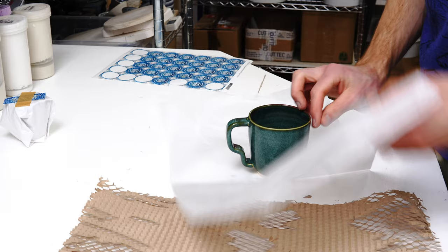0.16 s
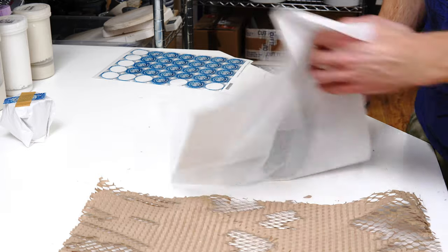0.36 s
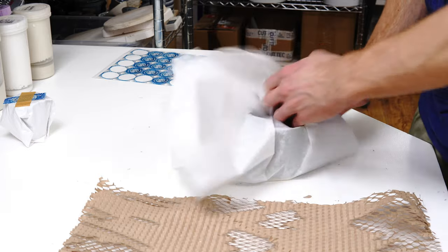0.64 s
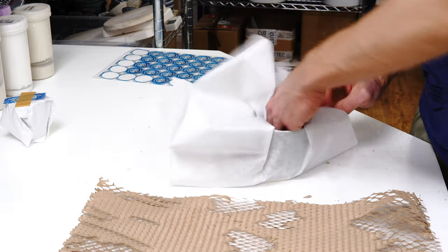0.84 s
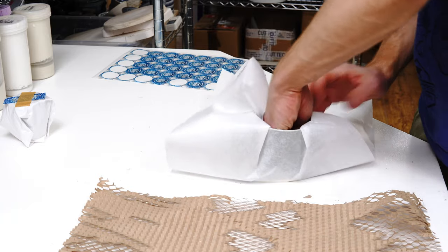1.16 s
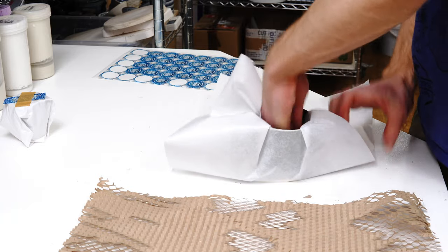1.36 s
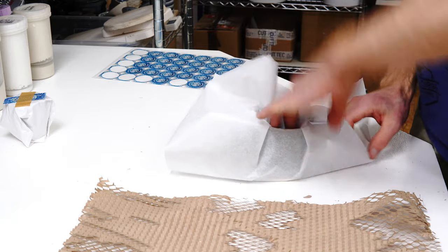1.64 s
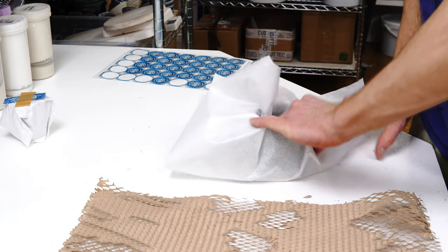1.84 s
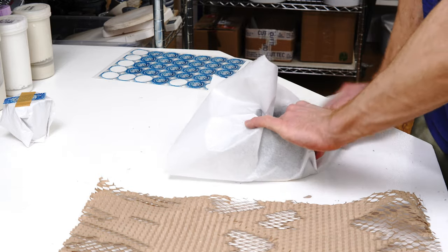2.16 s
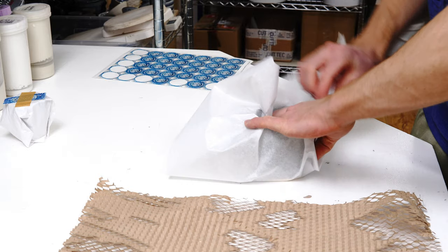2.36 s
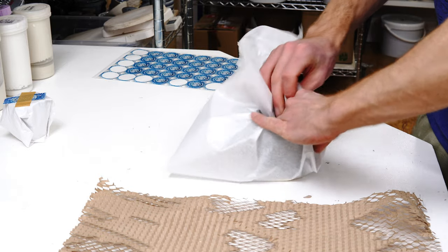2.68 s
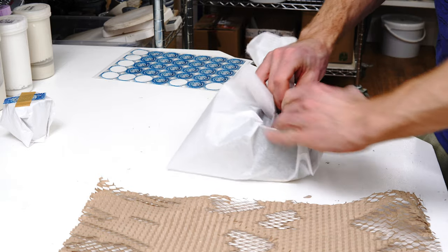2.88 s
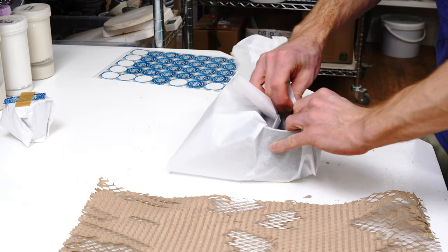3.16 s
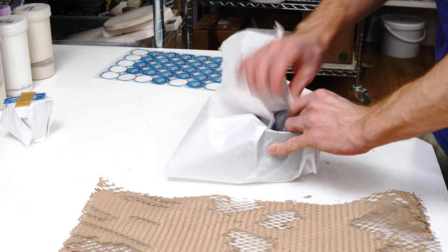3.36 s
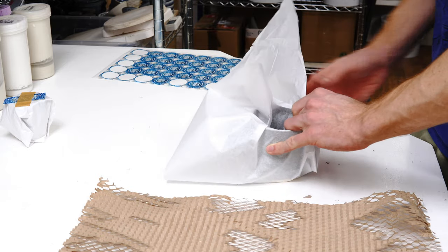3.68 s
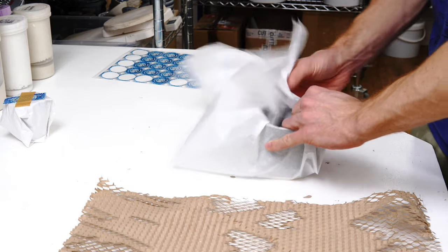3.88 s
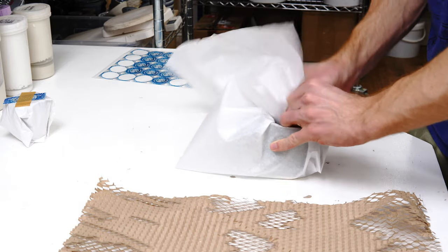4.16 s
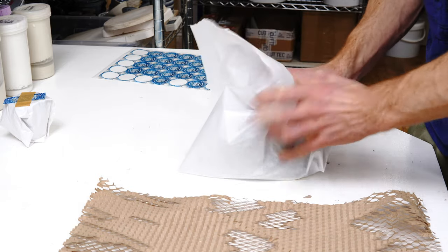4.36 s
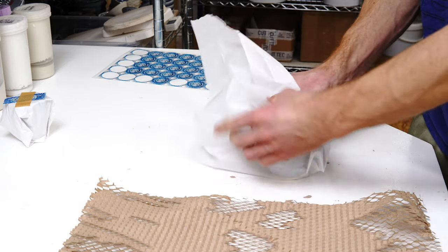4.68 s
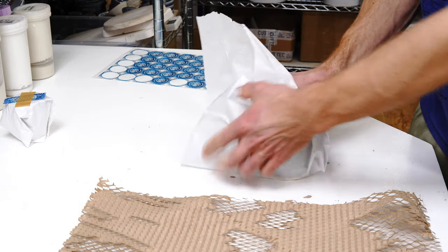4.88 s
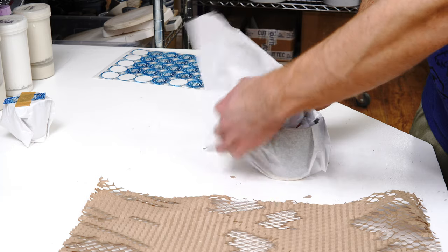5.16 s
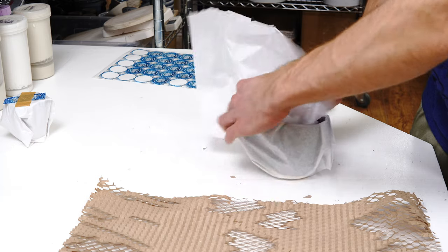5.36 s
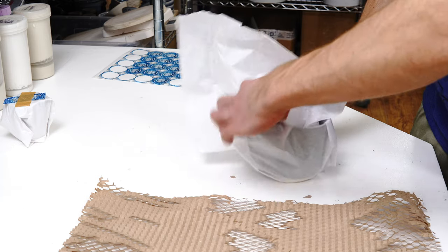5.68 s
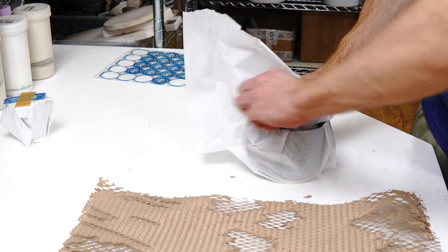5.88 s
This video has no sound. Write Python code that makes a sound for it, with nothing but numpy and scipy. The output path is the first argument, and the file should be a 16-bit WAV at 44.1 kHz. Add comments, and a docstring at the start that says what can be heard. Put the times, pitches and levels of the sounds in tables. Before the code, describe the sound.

Crisp, bright paper crinkling in quick uneven bursts, stuffed into a mug, while the wrapped ceramic clunks softly on a workbench in a small room.

```python
"""Tissue paper is folded over a ceramic mug on a workbench and tucked into its opening.
The sheet hisses as it slides, shaped noise; its creases buckle in clumps of filtered impulses.
Single folds snap with a sharp resonant click; the wrapped mug knocks on the bench as decaying modes.
Noise through resonances sounds the hollow of the mug, dull noise the hands on the bench.
A small workshop answers with decaying noise and adds mains hum and still air."""
import sys
import numpy as np
from scipy import signal
from scipy.fft import rfft, irfft, next_fast_len
from scipy.io import wavfile
from scipy.ndimage import uniform_filter1d, map_coordinates

SR = 44100
rng = np.random.default_rng(int(sys.argv[2]) if len(sys.argv) > 2 else 0)


def file_out(sig):
    """Save sig as 16-bit WAV at sys.argv[1]."""
    # one column per channel
    cols = np.atleast_2d(sig).T
    # limit, then scale
    lim = np.clip(cols, -1, 1)
    pcm = np.round(lim * 32767).astype(np.int16)
    wavfile.write(sys.argv[1], SR, pcm)


N = 265923

# colour of the sliding and buckling sheet: [f/Hz, relative level/dB]
PAPER_COLOUR = [(150, -29), (500, -14.5), (1000, -8), (1500, -10), (2000, -7.5), (2600, -4.5), (3400, -0.5),
                (4000, -4.5), (5000, -3.5), (6000, -6), (7300, -10.5), (10000, -11.5), (13000, -13),
                (16000, -21)]


def facet(pitch_hz, lift_db, octaves):
    """Plate resonance: one facet raises a broad band of the paper's colour around its pitch."""
    def shape_db(hz):
        distance = np.log2((hz + 1) / pitch_hz) / octaves
        return along(PAPER_COLOUR, hz) + lift_db * np.exp(-distance ** 2)
    return shape_db


def crinkle(level_db, crisp_db):
    """Buckling instability: facets of many sizes click in clumps over the hiss of sliding friction."""
    pace = amp(0.9 * (level_db - level_db.mean()))  # faster handling buckles more facets
    clicks = np.zeros(N)
    for pitch_hz in np.geomspace(1500, 14000, 10):
        share = amp(1.45 * wobble(11))  # the sheet keeps changing shape, so facet sizes come and go
        impulses = buckles(250 * pace, spread_db=4.5)
        clicks += share * coloured(impulses, facet(pitch_hz, lift_db=11, octaves=0.46))
    hiss = amp(-3.5) * noise(PAPER_COLOUR)
    sheet = unit(clicks / np.sqrt(pace)) + hiss
    clumps = slips(260 * pace ** 0.7, t60=0.022, spread_db=4.5)
    sheet = unit(sheet * clumps) * amp(level_db - 0.27)
    # a taut sheet and the heart of each clump sound brighter
    treble = filtered(sheet, lambda hz: hz ** 4 / (hz ** 4 + 6000 ** 4))
    treble_gain = amp(crisp_db - 1.86) * clumps ** 0.37
    return sheet + (treble_gain - 1) * treble


def buckles(rate, spread_db):
    """Shot noise: random impulses, rate a second, many small ones and a few large."""
    sizes = amp(spread_db * np.minimum(rng.standard_normal(N), 1.5))
    happens = rng.random(N) < rate / SR
    return happens * sizes * rng.choice([-1, 1], N)


def slips(rate, t60, spread_db):
    """Stick-slip: the sheet gives way in quick jerks that flare and die; a levelled envelope near rms 1."""
    t = np.arange(SR // 8) / SR
    flare = (1 - np.exp(-t / 0.0025)) * amp(-120 * t / t60)  # a power, so 60 dB down after t60
    power = np.abs(signal.fftconvolve(buckles(rate, spread_db) ** 2, flare)[:N])
    power = power / power.mean() + 0.73
    return np.sqrt(power / uniform_filter1d(power, SR // 20))


# pushes and pulls on the sheet: drawn over the mug and stuffed in, the side gathered, a corner tucked in,
# the last flap pressed down, the bundle twisted shut
# [t/s, rise t/s, length t/s, crinkle level/dB, treble lift level/dB, rubbing level/dB, brushing level/dB]
# the last three columns are relative to the crinkle
HAND_STROKES = [ (0.0, .09, .17, -23, 1.5, -30, -32), (0.222, 0.054, .16, -24.5, 2.5, -11, -19.5),
                (0.383, .045, 0.071, -17, 1, -9, -20), (0.476, .02, .09, -28.5, -5, 1, -11),
                (0.557, 0.064, .42, -16.5, 0, -7.5, -24.5), (0.984, .03, .17, -19, -4, -8.5, -18.5),
                (1.316, .008, .08, -29.5, -11, -22, -27), (1.38, 0.066, .13, -24.5, -2, -10.5, -22),
                (1.555, 0.024, .11, -31, -5, -8, -20), (1.709, 0.085, 0.17, -23, 1.5, -5.5, -16.5),
                (1.877, 0.042, .12, -23, 0, -4, -15.5), (2.022, .02, 0.084, -29.5, -2.5, -4.5, -16),
                (2.165, .03, 0.1, -31.5, -1, -6, -21), (2.246, 0.09, 0.11, -21, -0.5, -8.5, -18),
                (2.356, .05, 0.079, -19, 2, -8, -18.5), (2.487, 0.026, 0.36, -26, -2.5, -7.5, -20),
                (2.86, 0.026, 0.091, -28, -2, -6.5, -23), (2.955, .04, 0.077, -22, -5, -9.5, -19),
                (3.098, .04, 0.17, -24.5, 0, -7, -22.5), (3.28, .02, .07, -33, -2, -10, -19),
                (3.34, .07, .15, -26.5, -2, -8.5, -19.5), (3.517, .03, 0.14, -31, -4, -6.5, -14.5),
                (3.839, 0.013, .07, -20.5, 0.5, -8, -17), (3.881, .05, 0.075, -16.5, 0, -5.5, -19.5),
                (3.975, .02, .14, -23.5, -4.5, -5.5, -20), (4.13, 0.055, 0.24, -22.5, -2.5, -6, -20.5),
                (4.379, 0.021, .12, -26, -1, -5.5, -16), (4.579, 0.094, 0.13, -16, -3.5, -6.5, -22),
                (4.718, 0.035, 0.07, -19, 3, -4, -16), (4.816, 0.022, 0.15, -26, 1.5, -5, -16.5),
                (5.001, .04, 0.4, -20.5, -1.5, -5, -21), (5.422, 0.057, 0.083, -23, 2, -6, -21),
                (5.555, .035, 0.071, -24.5, -1.5, -9.5, -28), (5.648, 0.018, .08, -33.5, -1, -7, -18),
                (5.723, 0.035, 0.095, -27, 1, -6.5, -26.5), (5.857, .05, 0.14, -22.5, -2, -6.5, -24)]
RISE_DB, SAG_DB_PER_S, RELEASE_DB_PER_S = 11.5, 7, 211.5  # a stroke swells, tires, and the sheet settles
HELD_DB, HELD_TREBLE_DB, HELD_RUB_DB, HELD_BRUSH_DB = -45, 1, -43, -58.5  # the sheet merely held


def handling():
    """Incoherent addition: the powers of all strokes sum to crinkle, treble, rub and brush levels in dB."""
    held = amp([HELD_DB, HELD_DB + HELD_TREBLE_DB, HELD_RUB_DB, HELD_BRUSH_DB]) ** 2
    paper, treble, rubbing, brushing = np.outer(held, np.ones(N))
    t = np.arange(SR) / SR
    for s, rise, length, db, lift_db, rub_db, brush_db in HAND_STROKES:
        swell_db = RISE_DB * np.minimum(t / rise - 1, 0)
        sag_db = SAG_DB_PER_S * np.maximum(t - rise, 0)
        release_db = RELEASE_DB_PER_S * np.maximum(t - length, 0)
        power = amp(db + swell_db - sag_db - release_db) ** 2
        add(paper, s, power)
        add(treble, s, power * amp(lift_db) ** 2)
        add(rubbing, s, power * amp(rub_db) ** 2)
        add(brushing, s, power * amp(brush_db) ** 2)
    return 10 * np.log10([paper, treble / paper, rubbing, brushing])


# single folds that snap through, loud and faint:
# [t/s, relative level/dB, pitch f/Hz, relative level of the small clicks around the snap/dB]
FOLD_SNAPS = [(0.2888, -1.5, 5000, 4), (0.3338, 0, 5530, 7.5), (0.4359, 0, 4800, 7), (.516, -5, 4200, 2),
              (0.6664, -1, 5300, 7), (0.7226, 0, 4200, -9), (.8674, -5, 4500, 3), (0.916, 2, 3600, -4),
              (1.0291, 1.5, 4100, 2.5), (1.082, 0, 3680, 1), (1.125, 3.5, 4500, -1), (1.1663, 0, 3600, -12),
              (1.2405, -13, 3700, -5), (1.2966, -19.5, 3300, 3), (1.5752, -1.5, 4100, -5),
              (1.593, -8, 4000, 2.5), (1.665, -10, 3900, -2), (1.713, -15, 4700, 7),
              (1.8065, -1, 5100, 4.5), (1.861, -2, 4700, 0.5), (1.958, -3, 4600, 4),
              (1.9865, -2, 4200, 2.5), (2.164, -6.5, 3580, -3), (2.184, -11.5, 4100, 3),
              (2.478, -4, 4600, 4), (2.5236, 0, 4200, -5), (2.664, -9.5, 5100, 6), (2.7005, -5.5, 3480, 3),
              (2.811, -3.5, 4240, -6), (2.9154, -5, 6000, 4), (3.0609, -8.5, 3200, 6),
              (3.278, -9.5, 7200, 1), (3.3702, -3.5, 5000, -6), (3.451, -6.5, 4600, 6.5),
              (3.6306, -7, 4700, 7.5), (3.7067, -12, 5100, 1), (3.7305, -19, 4200, 4.5),
              (3.804, -16, 3190, 1), (3.8349, -6.5, 5100, -2), (4.1582, 0, 3240, 3),
              (4.6554, -3.5, 4000, 1), (4.8706, -3, 4600, 0), (4.9577, -10, 5300, 4), (5.0451, 3, 5000, -4),
              (5.0642, -4, 4370, 7.5), (5.139, -1.5, 4420, 1.5), (5.499, -8, 3800, 7.5),
              (5.5075, -3.5, 5000, 3)]


def snaps():
    """Snap-through: small clicks build up, the fold flips with a sharp one and sets off a short run."""
    lead_s = 0.008
    out = np.zeros(N)
    t = np.arange(-round(lead_s * SR), SR // 12) / SR
    for s, db, pitch_hz, trail_db in FOLD_SNAPS:
        click = coloured(signal.unit_impulse(256), facet(pitch_hz, lift_db=5, octaves=0.5))
        click = click / np.abs(click).max()
        swell_db = np.minimum(60 * t / 0.0092, -60 * t / 0.036)  # fast growth, slower decay
        run = rng.standard_normal(len(t)) * amp(3.3 * rng.standard_normal(len(t)) + swell_db)
        push = amp(trail_db + 3.0) * run / np.linalg.norm(run)
        push[t == 0] = 1  # the snap itself
        add(out, s + t[0], amp(db - 3.5) * np.convolve(push, click))
    return out


# the mug meets the bench: [t/s, clunk peak level/dB, clunk centre f/Hz, thud peak level/dB], before the room
MUG_KNOCKS = [(0.457, -14.5, 536, -21), (.517, -19, 597, -33), (1.112, -14, 970, -28),
              (1.984, -19, 1010, -38), (2.756, -27, 560, -24.5), (3.0227, -4, 906, -13),
              (3.449, -14.5, 845, -34), (3.565, -18.5, 695, -25.5), (3.728, -28, 880, -48),
              (4.413, -5.5, 960, -19), (4.437, -18.5, 920, -40), (4.707, -15, 1150, -23),
              (5.069, -24, 706, -27), (5.840, -25, 560, -22.5)]
# nominal modes of the mug on the bench: [f/Hz, relative level/dB, t60/s]
MUG_MODES = [(528, -2.5, 0.065), (669, -6, 0.072), (742, -8, .1), (800, 0.5, 0.051), (903, -6, 0.095),
             (991, 0.5, 0.035), (1030, -8.5, 0.021), (1196, -3, 0.041), (1360, -18, 0.077)]
# nominal modes of the bench top: [f/Hz, relative level/dB, t60/s]
BENCH_MODES = [(128, -12, 0.065), (179, -8, 0.08), (234, -2.5, 0.1), (284, -0.5, 0.08), (345, -1.5, 0.077),
               (426, 4.5, 0.051)]


def knocks():
    """Impact excitation: a paper-cushioned blow gives mug clunk and bench thud; the room scatters both."""
    out = np.zeros(N)
    t = np.arange(SR // 3) / SR
    for s, db, centre_hz, thud_db in MUG_KNOCKS:
        # the point of contact decides which modes speak
        modes = []
        for hz, level, t60 in MUG_MODES:
            contact_db = 20 * np.log10(focus(hz, centre_hz, depth_db=12.5))
            modes.append((hz, level + contact_db, t60))
        clunk = amp(db) * ring(modes, t, attack=0.0011)
        thud = amp(thud_db) * ring(BENCH_MODES, t, attack=0.0011)
        blow = clunk + thud
        add(out, s, blow)
        add(out, s + 0.0061, signal.fftconvolve(blow, reflections(wet_db=-14.5, near_db=-25.0)))
    return out


def ring(modes, t, attack):
    """Modal superposition: decaying sines at peak 1; the grip changes their pitches and levels each time."""
    tone = np.zeros(len(t))
    for hz, db, t60 in modes:
        detune, size, phase = rng.standard_normal(3)
        cycles = hz * (1 + 0.015 * detune) * t + 0.06 * phase
        tone += amp(db + 1.5 * size - 60 * t / t60) * np.sin(2 * np.pi * cycles)
    tone = tone * (1 - np.exp(-t / attack))
    return tone / np.abs(tone).max()


# resonances of the mug's hollow and the paper around it: [f/Hz, width f/Hz, relative level/dB]
HOLLOW_MODES = [(560, 230, -3), (746.5, 52, 1), (882.4, 42, 3.5), (1114, 247, -4.5)]
# the hands change the shape of the hollow: [t/s, f/Hz where it answers most]
POCKET_CENTRE = [(0, 930), (.45, 807), (.65, 915), (.8, 800), (1.2, 890), (1.7, 870), (2, 1070),
                 (2.4, 1070), (2.8, 940), (3.2, 686), (3.7, 770), (4, 800), (4.4, 820), (4.68, 1110),
                 (4.85, 1110), (5.1, 1000), (6, 880)]


def hollow(level_db):
    """Cavity resonance: rubbing and buckling excite the air in and around the mug."""
    centre_hz, = curves(POCKET_CENTRE)
    drive = unit(buckles(900, spread_db=11.0)) + 0.59 * rng.standard_normal(N)
    air = np.zeros(N)
    for k, (hz, width, db) in enumerate(HOLLOW_MODES):
        mode = filtered(drive, lambda f: 1j * f * width / (hz * hz - f * f + 1j * f * width))
        sign = (-1) ** k
        air += sign * amp(db) * focus(hz, centre_hz, depth_db=7.5) * mode
    return amp(level_db - 2.5) * unit(air)


def focus(hz, centre_hz, depth_db):
    """Selective excitation: gain falls by depth_db an octave either side of the centre."""
    return amp(-depth_db * np.abs(np.log2(hz / centre_hz)))


# colour of the dull brushing: [f/Hz, relative level/dB]
RUB_COLOUR = [(25, -19), (90, -1), (200, -0.5), (400, -0.5), (700, -3.5), (1500, -39)]


def brush(level_db):
    """Friction noise: the dull, uneven sound of hands and the loose sheet on the bench."""
    return amp(level_db - 0.5 + 2.34 * wobble(25)) * noise(RUB_COLOUR)


def workshop(x, wet_db, near_db, size):
    """Diffuse room response by convolution: each block of size samples gets freshly drawn reflections."""
    out = x.copy()
    for start in range(0, N, size):
        add(out, start / SR, signal.fftconvolve(x[start:start + size], reflections(wet_db, near_db)))
    return out


# decay of the workshop: [f/Hz, t60/s]
WORKSHOP_DECAY = [(150, 0.2), (1000, 0.47), (4000, 0.35), (14000, 0.04)]


def reflections(wet_db, near_db):
    """Exponential decay of diffuse sound: bench and shelves answer at once, with a short room tail."""
    hz, t, z = signal.stft(rng.standard_normal(SR // 4), SR, nperseg=256)
    decay = amp(-60 * t / along(WORKSHOP_DECAY, hz)[:, None])
    tail = signal.istft(z * decay, SR, nperseg=256)[1]
    t = np.arange(len(tail)) / SR
    near = rng.standard_normal(len(t)) * amp(-60 * t / 0.057) * (t > 0.001)
    return amp(wet_db) * tail / np.linalg.norm(tail) + amp(near_db) * near / np.linalg.norm(near)


# colour of the still air: [f/Hz, relative level/dB]
AIR_COLOUR = [(20, 10), (60, 1), (150, -4), (800, -17), (3000, 1), (16000, -58)]


def background():
    """Stationary ambience: a 50 Hz mains tone and the shaped noise of still air."""
    hum = np.sqrt(2) * np.sin(2 * np.pi * 50 * np.arange(N) / SR)
    return amp(-50.5 + 0.5 * wobble(4.7)) * hum + amp(-49) * noise(AIR_COLOUR)


def amp(db):
    """Logarithmic level: decibels to gain."""
    return 10 ** (np.asarray(db) / 20)


def unit(x):
    """Normalisation: scale to rms 1."""
    return x / np.sqrt(np.mean(x ** 2) + 1e-20)


def along(points, hz):
    """Logarithmic frequency: (f/Hz, value) points interpolated on a log axis."""
    f, v = np.transpose(points)
    return np.interp(np.log(hz + 1), np.log(f), v)


def curves(rows):
    """Linear interpolation: one value per sample for each column after the time."""
    s, *cols = np.transpose(rows)
    return [np.interp(np.arange(N) / SR, s, c) for c in cols]


def wobble(rate):
    """Slow random modulation: a smooth curve of rms 1 through rate random knots a second."""
    knots = rng.standard_normal(N // 10)
    return unit(map_coordinates(knots, [np.arange(N) * rate / SR], order=2, mode="wrap"))


def filtered(x, response):
    """Linear filtering: the spectrum of x times a response of frequency."""
    size = next_fast_len(len(x) + SR // 10, True)
    return irfft(rfft(x, size) * response(np.fft.rfftfreq(size, 1 / SR)), size)[:len(x)]


def coloured(x, shape, size=1024):
    """Minimum-phase filtering: a causal filter, built by folding the cepstrum, with gain shape(Hz) in dB."""
    cepstrum = irfft(np.log(amp(shape(np.fft.rfftfreq(size, 1 / SR)))))
    cepstrum[1:size // 2] *= 2
    cepstrum[size // 2 + 1:] = 0
    return signal.oaconvolve(x, irfft(np.exp(rfft(cepstrum))))[:len(x)]


def noise(spectrum):
    """Spectral shaping: Gaussian noise of rms 1 with the given spectrum."""
    return unit(filtered(rng.standard_normal(N), lambda hz: amp(along(spectrum, hz))))


def add(track, s, sound):
    """Superposition: mix a sound into the track at time s, in place."""
    part = track[max(0, round(s * SR)):][:len(sound)]
    part += sound[:len(part)]


def scene():
    """Superposition of all sources: paper and mug in the room, one channel."""
    level_db, crisp_db, rub_db, brush_db = handling()
    paper = workshop(crinkle(level_db, crisp_db) + snaps(), wet_db=-10, near_db=-8, size=768)
    return (paper + knocks() + hollow(rub_db) + brush(brush_db) + background())[None]


TOP_HZ = 16100  # band limit


def record(dry):
    """Saturation and band limiting: clip at full scale, then keep nothing above the band limit."""
    return filtered(np.clip(dry[0], -1, 1), lambda hz: hz < TOP_HZ)[None]


dry = scene()
out = record(dry)
file_out(out)
```